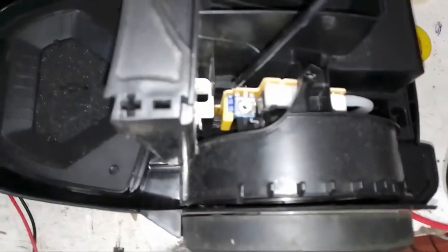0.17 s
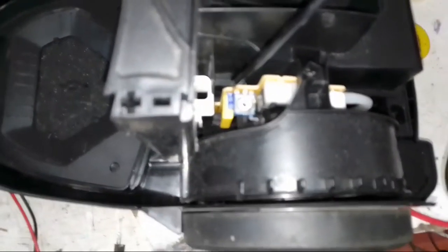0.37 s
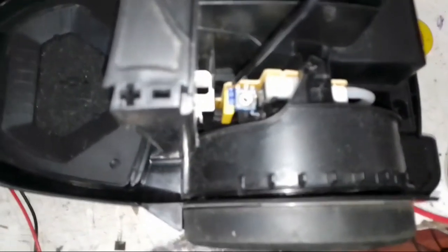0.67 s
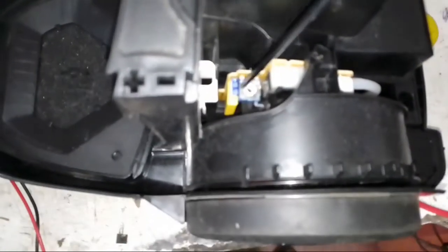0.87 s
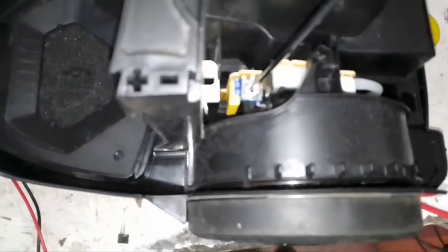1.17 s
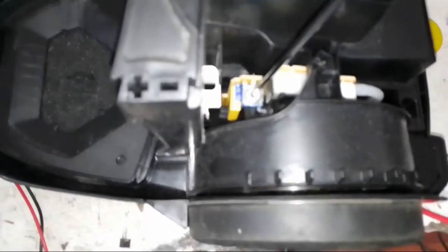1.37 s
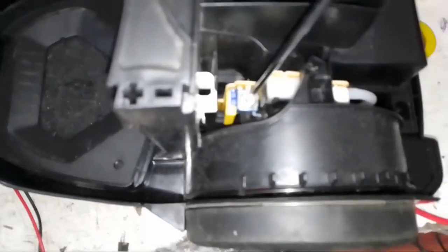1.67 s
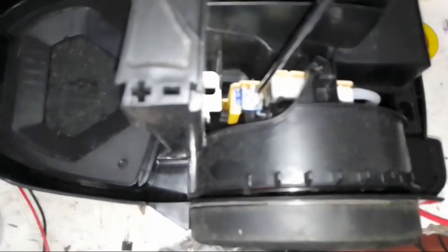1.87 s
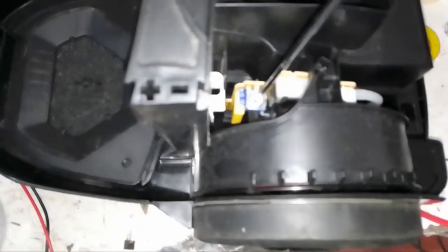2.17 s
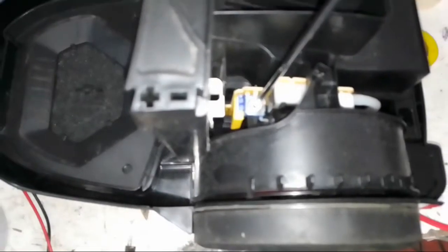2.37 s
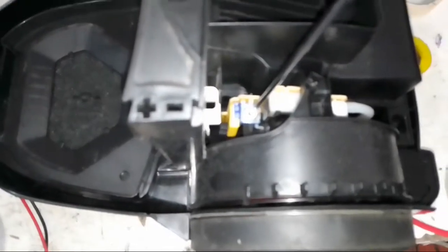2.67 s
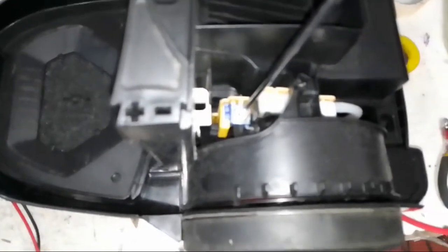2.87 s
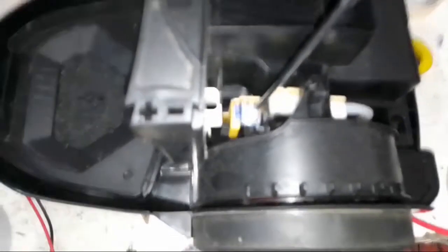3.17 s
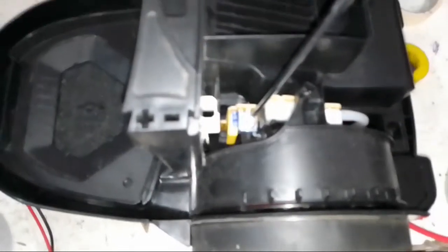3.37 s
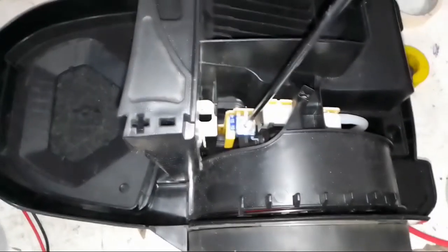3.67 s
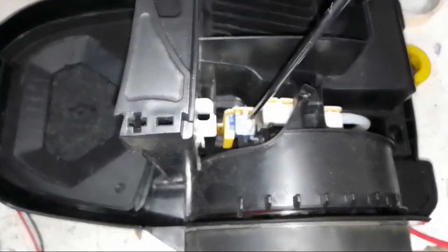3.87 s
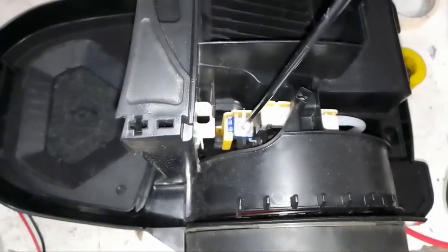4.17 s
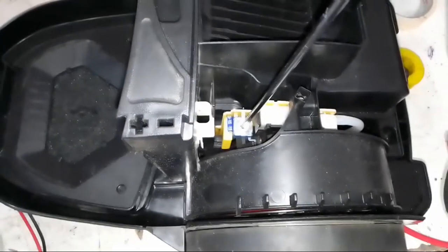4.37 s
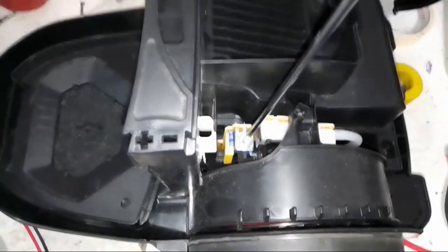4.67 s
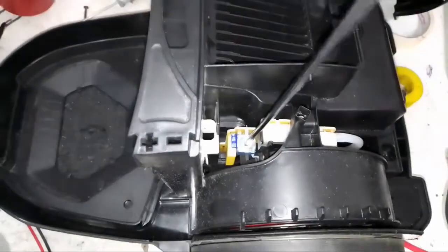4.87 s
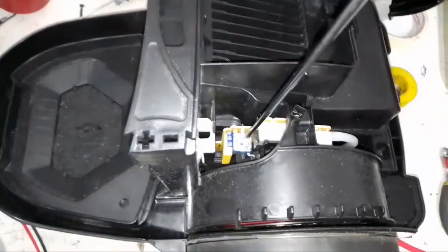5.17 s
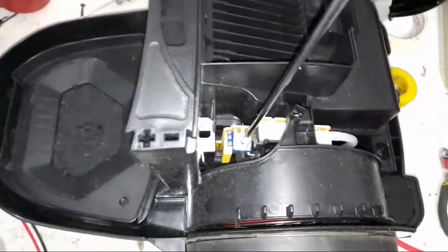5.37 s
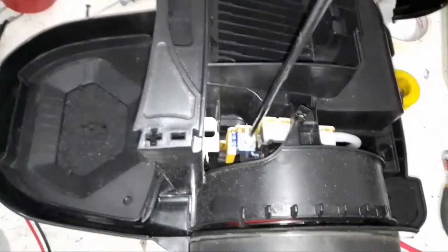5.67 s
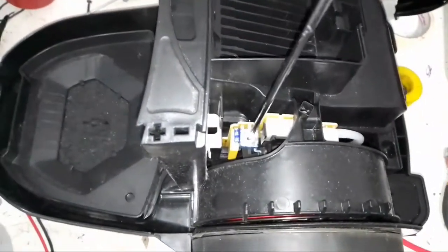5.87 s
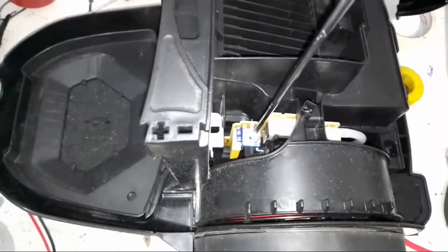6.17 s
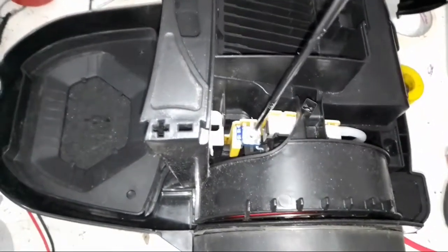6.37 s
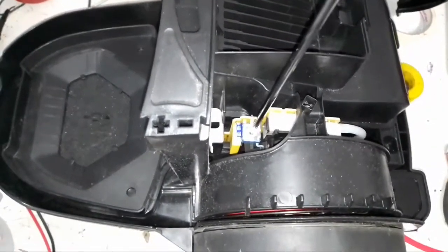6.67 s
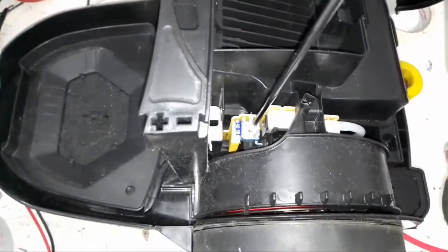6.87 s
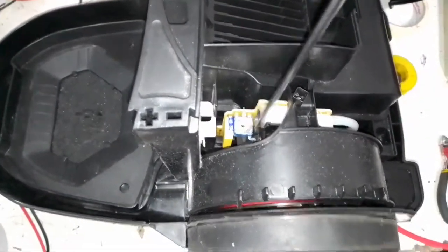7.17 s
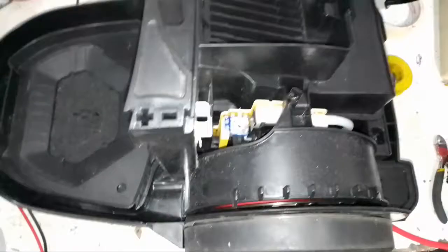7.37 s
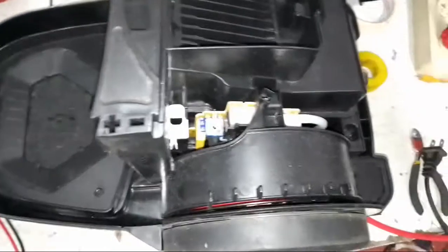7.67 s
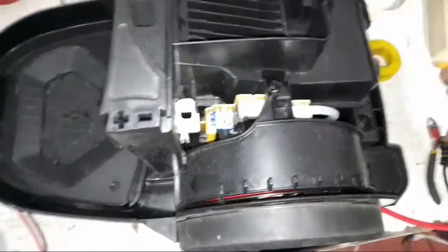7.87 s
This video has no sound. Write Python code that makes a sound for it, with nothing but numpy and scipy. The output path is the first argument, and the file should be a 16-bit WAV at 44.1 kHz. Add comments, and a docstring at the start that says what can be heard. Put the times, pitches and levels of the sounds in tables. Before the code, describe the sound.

Indoors, close to the microphone, brushes rasp inside a slow-running vacuum motor. After a quick little cluster of screwdriver knocks, the motor accelerates sharply into a piercing whine with broad hissing airflow and a faint low drone. The loud steady roar rises slightly in pitch, then drops unevenly, losing its air rush and sinking back to gritty whirring. Short room reflections, no speech.

```python
"""Vacuum cleaner motor turned up and down

An opened vacuum cleaner idles on a workbench while a screwdriver knocks on its speed trimmer.
Turned up, the motor whines up to a rush of air, holds, gains a little more, then runs slowly down.
Shaped noise makes the brushes ringing the plastic housing, the air rush and a faint low rumble.
Tones tied to the turning shaft make the blade whine, the rotor's song and the drone; the mains adds hum.
The knocks are short dying tones, and sparse reflections make the small room."""
import sys
import numpy as np
from scipy import signal
from scipy.fft import rfft, irfft
from scipy.io import wavfile
from scipy.ndimage import uniform_filter1d

SR = 44100
rng = np.random.default_rng(int(sys.argv[2]) if len(sys.argv) > 2 else 0)


def store_pcm(level_fs):
    """Save levels as 16-bit WAV."""
    pcm = np.round(np.clip(level_fs, -1, 1) * 32767).astype(np.int16)
    wavfile.write(sys.argv[1], SR, np.atleast_2d(pcm).T)


N = 353196
TIME = np.arange(N) / SR
FRAME, OVERLAP = 2048, 1536  # samples, for the short-time spectra
BLADES = 15
FULL_SPEED = 600  # shaft turns per second
EDGE_HZ = 15480  # top of the recorded range


def amp(db):
    """Turns decibels into gain."""
    return 10 ** (np.asarray(db) / 20)


def evened(x):
    """Scales to an rms of one."""
    return x / np.sqrt(np.mean(x ** 2) + 1e-20)


def curve(rows, t):
    """Reads a time table, with straight lines between its rows."""
    return np.interp(t, *np.transpose(rows))


def read(points, hz):
    """Reads a spectrum table on a log-frequency axis."""
    f, value = np.transpose(points)
    return np.interp(np.log(hz + 1), np.log(f + 1), value)


def lift(resonances, hz):
    """Decibels added by bell-shaped resonances."""
    return sum(db * .5 ** ((2 * (hz - f) / width) ** 2) for f, width, db in resonances)


def colour(slope, resonances, hz):
    """Gain of a broad spectrum lifted by resonances."""
    return amp(read(slope, hz) + lift(resonances, hz))


def wander(rate_hz):
    """Slow random signal of rms one, moving up to about the given rate."""
    hz = np.fft.rfftfreq(N, 1 / SR)
    spectrum = rfft(rng.standard_normal(N))
    return evened(irfft(spectrum / (1 + (hz / rate_hz) ** 2), N))


def frame_grid():
    """Frequencies (a column) and times (a row) of short-time spectra."""
    hz, t, _ = signal.stft(np.zeros(N), SR, nperseg=FRAME, noverlap=OVERLAP)
    return hz[:, None], t


def noise(gain, drift_db):
    """White noise shaped over frequency and time; narrow bands swell and fade as the microphone sways."""
    z = signal.stft(rng.standard_normal(N), nperseg=FRAME, noverlap=OVERLAP)[2]
    # random patches, smoothed across frequency and then across time
    patches = uniform_filter1d(rng.standard_normal(z.shape), size=7, axis=0)
    patches = evened(uniform_filter1d(patches, size=50, axis=1))
    shaped = z * gain * amp(drift_db * patches)
    return signal.istft(shaped, nperseg=FRAME, noverlap=OVERLAP)[1][:N]


def fluttering(turns, flutter, rate_hz):
    """A tone of rms one whose strength and phase are shaken by turbulence."""
    inflow = 1 + flutter * (wander(rate_hz) + 1j * wander(rate_hz))
    return evened((inflow * np.exp(2j * np.pi * turns)).real)


# setting of the speed trimmer: (time [s], speed the motor heads for [shaft turns per second])
TRIMMER_SETTING = [(2.262, 169.1), (2.349, 343.4), (2.621, 286.3), (2.65, 367.1), (2.786, 498.8),
                   (3.11, 594.8), (4.87, 602.3), (5.174, 639.9), (5.621, 642.8), (5.816, 604.6),
                   (6.129, 425.4), (6.396, 431.9), (6.472, 283.1), (7.084, 146.4)]


def shaft_speed(lag_s=.213, drag_power=1.74):
    """Turns per second: inertia makes the rotor trail the trimmer, most when slow, as the fan brakes less."""
    step_s = .005
    t = np.arange(0, N / SR + step_s, step_s)
    settings = curve(TRIMMER_SETTING, t)
    speeds = [settings[0]]
    for setting in settings[:-1]:
        now = speeds[-1]
        # one at full speed, where the lag is lag_s
        drag = ((setting + now) / 2 / FULL_SPEED) ** drag_power
        speeds.append(now + (setting - now) * drag * step_s / lag_s)
    return np.interp(TIME, t, speeds)


def shaft_turns(speed, waver=0.00027):
    """Angle of the shaft in turns; the speed wavers slightly."""
    return np.cumsum(speed * (1 + waver * wander(rate_hz=7.4))) / SR


# brushes scraping the commutator: (frequency [Hz], relative level per Hz [dB])
BRUSH_SCRAPE = [(30, -28), (70, -41), (170, -39), (220, -14), (300, -9.5), (1100, -23), (1500, -30),
                (2300, 1), (4100, -34), (5600, -26.5), (8000, -24.5), (10500, -29.5), (15000, -38.5)]
# housing resonances that the brushes shake: (frequency [Hz], width [Hz], lift [dB])
HOUSING_RESONANCES = [(384, 148, 9.5), (727, 295, 10), (1319, 200, 22), (1570, 52, 4), (1680, 210, 3),
                      (1973, 247, 12.5), (2700, 290, 3), (2928, 220, 13.5), (3247, 244, 19.5),
                      (3437, 103, 14.5), (3706, 110, 9.5), (3850, 275, 18.5), (4370, 250, 14),
                      (4996, 250, 9), (5840, 190, 20.5), (6080, 54, 12), (6260, 410, 18), (6930, 250, 10.5),
                      (7600, 160, 2), (7936, 665, 20), (8330, 280, 16.5), (9200, 250, 12), (9952, 238, 3.5)]
# changing lift of the hollow-sounding band in the brush noise: (time [s], level [dB])
HOLLOW_BAND = [(0, -3), (.5, -5.5), (.7, 0), (1, -4), (1.5, 5.5), (1.9, -5), (2.4, 3)]


def brushes(speed, turns, base_db=-32.5, growth=0.16, unsteady_db=.5,
            chatter_db=5.5, chatter_speed=315, chatter_octaves=0.49,
            once=0.041, thrice=0.028, hollow_hz=740, hollow_width_hz=250):
    """Friction noise rings the housing, loudest at middling speed; brush pressure ripples with each turn."""
    hz, t = frame_grid()
    hollow_bell = np.exp(-((hz - hollow_hz) / hollow_width_hz) ** 2)
    hollow = amp(curve(HOLLOW_BAND, t) * hollow_bell)
    scrape = evened(colour(BRUSH_SCRAPE, HOUSING_RESONANCES, hz))
    angle = 2 * np.pi * turns
    ripple = 1 + once * np.cos(angle) + thrice * np.cos(3 * angle)
    # extra level around chatter_speed, in turns per second
    chatter = chatter_db * np.exp(-(np.log2(speed / chatter_speed) / chatter_octaves) ** 2)
    level = amp(base_db + chatter + unsteady_db * wander(rate_hz=8))
    level = level * (speed / speed[0]) ** growth
    return level * ripple * noise(scrape * hollow, drift_db=2.1)


# forces of the rotor on the housing, at idle and before the housing colours them:
# (multiple of the shaft speed, level [dB])
ROTOR_FORCES = [(12, -54), (24, -33), (48, -40), (72, -37)]


def rotor(speed, turns, growth=2.1, flutter_db=2, housing_share=0.65):
    """Armature slots and commutator bars push harder with speed and sing at the housing resonances."""
    _, t = frame_grid()
    pace = np.interp(t, TIME, speed)
    out = np.zeros(N)
    for multiple, db in ROTOR_FORCES:
        hz = multiple * pace
        # the tones share the brush noise's broad slope and part of the housing's ring
        ring = amp(read(BRUSH_SCRAPE, hz) + housing_share * lift(HOUSING_RESONANCES, hz))
        strength = (pace / pace[0]) ** growth * ring * (hz < EDGE_HZ)
        level = amp(db + flutter_db * wander(rate_hz=8.7))
        tone = np.sqrt(2) * np.sin(2 * np.pi * multiple * turns)
        out += np.interp(TIME, t, strength) * level * tone
    return out


def hum(speed, hum_db=-69, surge_db=10, hard_turns_per_s2=200, waver_db=2.0):
    """Field coils pull twice per mains cycle, harder while the rotor draws current to speed up."""
    pull = np.sin(2 * np.pi * 120 * TIME)
    acceleration = uniform_filter1d(np.gradient(speed, TIME), size=8000)
    surge = surge_db * np.tanh(np.maximum(acceleration, 0) / hard_turns_per_s2)
    return amp(hum_db + surge + waver_db * wander(rate_hz=4)) * pull


# the screwdriver knocks on the speed control: (time [s], level [dB])
KNOCK_TIMES = [(1.247, -35), (1.320, -30), (1.333, -32)]
# modes of the control board and its mount: (frequency [Hz], relative level [dB], time to fall 60 dB [s])
BOARD_MODES = [(1184, -5, 0.21), (1586, -7, 0.11), (1990, 9.5, 0.11), (2420, 13, 0.049), (2920, -2, .04),
               (3600, -7, .03), (3820, -1, .04), (4240, -10, 0.033)]


def screwdriver(rise_s=.002):
    """Each knock rings the control board, whose modes die away at their own speeds."""
    out = np.zeros(N)
    t = TIME[:SR // 2]
    ring = sum(amp(db - 60 * t / t60) * np.sin(2 * np.pi * hz * t) for hz, db, t60 in BOARD_MODES)
    ring = ring * (1 - np.exp(-t / rise_s))
    for s, db in KNOCK_TIMES:
        out[round(s * SR):][:len(t)] += amp(db) * ring
    return out


def flow(speed, growth=1.07, onset_speed=230, onset_steepness=21):
    """Air stream, about one at full speed: it sets in steeply above idle, then grows with speed."""
    onset = 1 / np.sqrt(1 + (onset_speed / speed) ** onset_steepness)
    return (speed / FULL_SPEED) ** growth * onset


# turbulence leaving the fan: (frequency [Hz], relative level per Hz [dB])
AIR_TURBULENCE = [(30, -54), (60, -74), (120, -52), (165, -59), (210, -15), (300, -8), (750, -5),
                  (1600, -4), (2500, -0.13), (4800, -7.5), (8500, 0.5), (10500, -7.5), (12500, -10.5),
                  (15000, -12.5)]
# resonances of the air passages: (frequency [Hz], width [Hz], lift [dB])
DUCT_RESONANCES = [(313, 30, 6), (643, 130, 2.5), (1202, 226, 4), (1406, 92, 2.5), (1970, 73, 5),
                   (2127, 125, 3), (2605, 140, 3.5), (2990, 370, 5.5), (3460, 220, 5.5), (3900, 230, 4.5),
                   (4306, 100, 6), (5081, 220, 2.5), (5990, 420, 6), (6740, 320, 4.5), (7200, 270, 0),
                   (7880, 217, 5.5), (8260, 169, 6), (9100, 780, 3), (9400, 120, 4), (10019, 247, 4.5),
                   (11111, 220, 5)]


def air(speed, base_db=-13.5, eddies_per_turn=38, steepness=11, unsteady_db=0.4, housing_share=0.2):
    """Turbulence in the ducts: a slow stream takes on the housing's ring, a fast one hisses higher."""
    hz, t = frame_grid()
    pace = np.interp(t, TIME, speed)
    slowness = (1 - pace / pace.max()) ** 2
    housing = colour(BRUSH_SCRAPE, HOUSING_RESONANCES, hz) ** (housing_share * slowness)
    shape = colour(AIR_TURBULENCE, DUCT_RESONANCES, hz) * housing
    shape = shape / np.sqrt(np.mean(shape ** 2, axis=0))
    # the hiss reaches up to a frequency that follows the shaft
    reach = 1 / np.sqrt(1 + (hz / (eddies_per_turn * pace)) ** steepness)
    level = amp(base_db + unsteady_db * wander(rate_hz=13)) * flow(speed)
    return level * noise(shape * reach, drift_db=1.2)


# peaks and notches of the fan outlet that the blade tone sweeps through:
# (frequency [Hz], width [Hz], lift [dB])
OUTLET_RESONANCES = [(2903, 221, 11.2), (3294, 442, 12.9), (4026, 899, -5.3), (4668, 147, 4.9),
                     (5111, 148, 7.0), (6037, 518, 13.3), (6677, 316, 6.7), (6966, 160, -10.8),
                     (7248, 256, 6.5), (8117, 519, 8.9), (8579, 267, 8.3), (8934, 98, 6.2),
                     (9408, 94, -6.6), (9524, 70, 3.7)]


def fan(speed, turns, whine_db=-22.5, growth=1.38, fading_db=1.0,
        octave_db=-17, octave_hz=8270, octave_width_hz=400):
    """Blades chop air into a whine that swells in the outlet's resonances; its octave rings the housing."""
    level_db = whine_db + lift(OUTLET_RESONANCES, BLADES * speed) + fading_db * wander(rate_hz=3.5)
    level = amp(level_db) * (speed / FULL_SPEED) ** growth
    tone = level * fluttering(BLADES * turns, flutter=0.17, rate_hz=35)
    # the octave is strongest as it passes octave_hz
    detune = (2 * BLADES * speed - octave_hz) / octave_width_hz
    octave = fluttering(2 * BLADES * turns, flutter=0.25, rate_hz=25) / (1 + detune ** 2)
    return tone + amp(octave_db) * flow(speed) * octave


# resonances of the casing that the lopsided impeller shakes: (frequency [Hz], width [Hz], lift [dB])
CASING_RESONANCES = [(434, 74, 13.5), (557, 39, 9)]


def imbalance(speed, turns, drone_db=-46, octave_db=-44.5):
    """The slightly lopsided impeller drones at the shaft speed and, unsteadily, at its octave."""
    drone_level = amp(drone_db + lift(CASING_RESONANCES, speed))
    once = drone_level * fluttering(turns, flutter=0.44, rate_hz=8.8)
    twice = amp(octave_db) * fluttering(2 * turns, flutter=1.4, rate_hz=5.3)
    return flow(speed) * (once + twice)


def rumble(speed, base_db=-62, centre_hz=112, width_octaves=0.23, growth=0.96, swell_db=6):
    """A faint, uneven low rumble: a narrow band of noise that rises with the motor's roar."""
    hz, _ = frame_grid()
    band = evened(np.exp(-(np.log2((hz + 1) / centre_hz) / width_octaves) ** 2))
    level = amp(base_db + swell_db * wander(rate_hz=7)) * flow(speed) ** growth
    return level * noise(band, drift_db=1)


# how fast the room's echoes die: (frequency [Hz], time to fall 60 dB [s])
ROOM_DECAY = [(200, 0.15), (2000, 0.15), (8000, 0.16), (15000, 0.084)]


def room(x, wet_db):
    """Adds sparse reflections, each band dying at its own speed; the power stays about the same."""
    # about 2000 reflections a second, none in the first 2.5 ms
    taps = rng.choice([-1., 1.], SR // 2) * (rng.random(SR // 2) < 2000 / SR)
    taps[:SR // 400] = 0
    hz, t, z = signal.stft(taps, SR, nperseg=256)
    decay = amp(-60 * t / read(ROOM_DECAY, hz)[:, None])
    tail = signal.istft(z * decay, SR)[1]
    wet = signal.fftconvolve(x, tail / np.linalg.norm(tail))[:N]
    return (x + amp(wet_db) * wet) / np.sqrt(1 + amp(wet_db) ** 2)


def scene():
    """The motor close by in a small room, alike in both ears; the whine bounces about more than the rest."""
    speed = shaft_speed()
    turns = shaft_turns(speed)
    rush = brushes(speed, turns) + air(speed)
    tones = rotor(speed, turns) + hum(speed) + screwdriver() + imbalance(speed, turns)
    whine = room(fan(speed, turns), wet_db=-9.5)
    # the rumble is added without the room
    mono = room(rush + tones, wet_db=-14.5) + whine + rumble(speed)
    return np.array([mono] * 2)


def record(dry, input_db=0.23, ceiling=.57, low_cut_hz=105):
    """At full speed the roar overloads the recorder, which flattens peaks, then cuts the bass and the top."""
    driven = amp(input_db) * dry
    flattened = driven / (1 + (driven / ceiling) ** 12) ** (1 / 12)
    low_cut = signal.butter(2, low_cut_hz, "highpass", fs=SR, output="sos")
    thinned = signal.sosfilt(low_cut, flattened)
    low_pass = signal.firwin(1023, EDGE_HZ, window=("kaiser", 9), fs=SR)
    return signal.oaconvolve(thinned, low_pass[None], "same", axes=1)


dry = scene()
out = record(dry)
store_pcm(out)
```